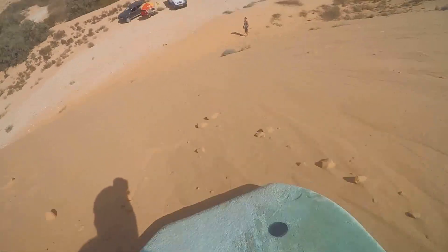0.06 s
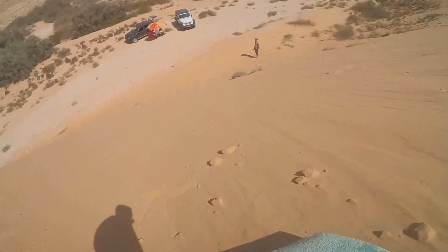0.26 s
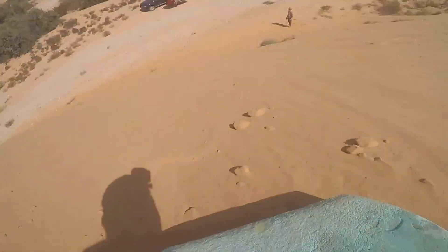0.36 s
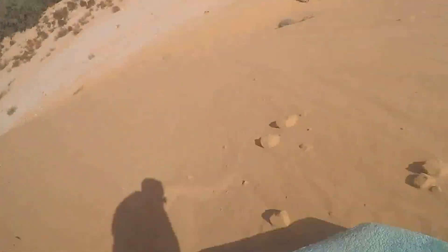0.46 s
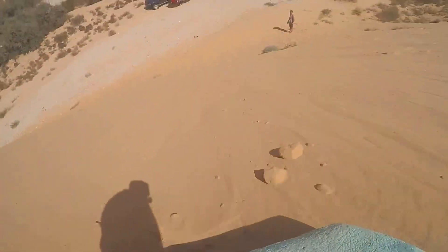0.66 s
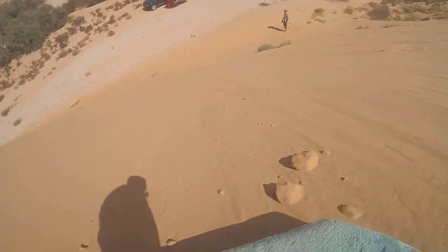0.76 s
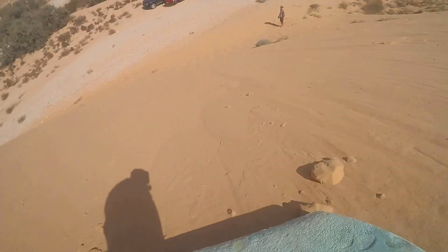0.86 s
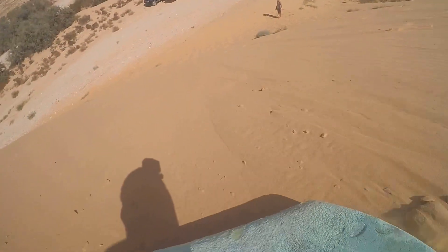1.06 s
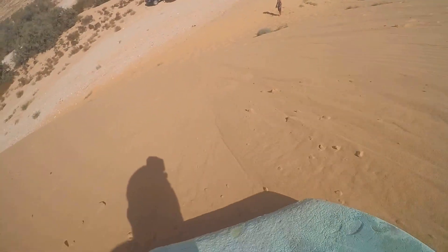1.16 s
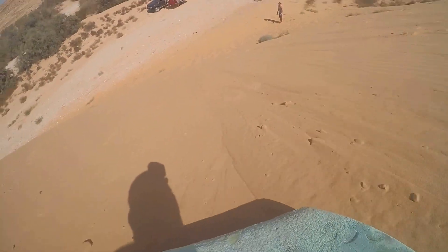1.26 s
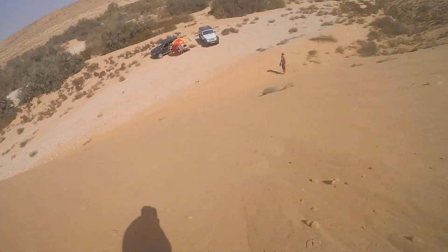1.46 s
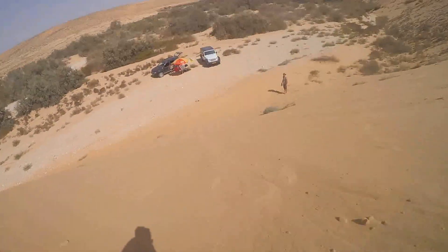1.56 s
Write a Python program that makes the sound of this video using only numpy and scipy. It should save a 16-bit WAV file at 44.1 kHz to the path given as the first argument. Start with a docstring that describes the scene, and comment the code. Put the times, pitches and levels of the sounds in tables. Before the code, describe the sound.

Sandy hiss of a sliding board, knocking over a bump as wind gusts on the microphone.

```python
"""A sandy hiss over low wind rumble: a board glides down a dune, heard from the rider's seat.
Countless grains rub its underside and sound its resonances, with a dry rasp early in the run and a
coarser crunch where the board digs in. Over a bump it rattles with a few hard knocks while a gust
heaves the air at the microphone."""
import sys
import numpy as np
from scipy import signal
from scipy.fft import rfft, irfft
from scipy.io import wavfile

SR = 44100
rng = np.random.default_rng(int(sys.argv[2]) if len(sys.argv) > 2 else 0)


def generate_wav(sig):
    """Save sig (samples, or channels by samples) to the path in sys.argv[1] as 16-bit PCM at SR."""
    pcm = np.round(np.clip(np.atleast_2d(sig).T, -1, 1) * 32767).astype(np.int16)
    wavfile.write(sys.argv[1], SR, pcm)


N = 70560
T = np.arange(N) / SR
BINS_HZ = np.arange(N // 2 + 1) * SR / N


def from_db(db):
    """Decibels to gain."""
    return 10 ** (np.asarray(db) / 20)


def unit_rms(x):
    """Scale to rms 1."""
    return x / np.sqrt(np.mean(x ** 2) + 1e-20)


def level(points):
    """Gain over time from (time_s, level_db) points."""
    return from_db(np.interp(T, *np.transpose(points)))


def spectrum(points):
    """Gain over frequency from (frequency_hz, gain_db) points."""
    hz, db = np.transpose(points)
    return from_db(np.interp(np.log(np.maximum(BINS_HZ, 1)), np.log(hz), db))


def coloured(x, points):
    """Give a steady sound the colour of these points."""
    return irfft(rfft(x) * spectrum(points), N)


def pulse(points):
    """The shortest causal pulse with the colour of these points."""
    cepstrum = irfft(np.log(spectrum(points)), N)
    cepstrum[1:N // 2] *= 2
    cepstrum[N // 2 + 1:] = 0
    return irfft(np.exp(rfft(cepstrum)), N)


def drift(hz):
    """A random wander, mostly slower than hz; rms 1."""
    return unit_rms(irfft(rfft(rng.standard_normal(N)) / (1 + (BINS_HZ / hz) ** 2), N))


def resonate(x, hz, width_hz):
    """A steep-sided resonance with gain 1 at its peak."""
    r = np.exp(-np.pi * width_hz / np.sqrt(np.sqrt(2) - 1) / SR)
    b = (1 - r * r) / 2 * np.array([1, 0, -1])
    a = [1, -2 * r * np.cos(2 * np.pi * hz / SR), r * r]
    return signal.lfilter(b, a, signal.lfilter(b, a, x))


def ring(hz, t60_s):
    """A struck mode: a sine that dies away from height 1."""
    return np.sin(2 * np.pi * hz * T) * from_db(-60 * T / t60_s)


def grains(per_s, spread_db):
    """Tiny random impacts of sand, uneven in size; rms 1."""
    sizes = from_db(spread_db * np.minimum(rng.exponential(1, N), 5))
    signs = rng.choice([-1, 1], N)
    strikes = rng.random(N) < per_s / SR
    return unit_rms(sizes * signs * strikes)


def rubbed(resonances, per_s, spread_db):
    """Each resonance is kept sounding by its own stream of grains."""
    return sum(from_db(db) * resonate(grains(per_s, spread_db), hz, width_hz)
               for hz, width_hz, db in resonances)


# Wind right on the microphone: time_s, level_db
WIND_LEVEL = [(0, -33), (.09, -40), (.16, -29.5), (.235, -21.5), (.285, -25), (.345, -17.5), (.44, -18),
              (.57, -21.5), (.66, -33.5), (.79, -32), (.88, -39.5), (1.0, -38.5), (1.28, -41.5),
              (1.42, -36), (1.47, -28), (1.52, -48.5), (1.6, -40.5)]
# Its colour, nearly all low end: frequency_hz, gain_db
WIND_SPECTRUM = [(10, 0.5), (22, 3.5), (36, -4), (48, -13.5), (62, -28), (100, -38.5), (200, -48),
                 (500, -56.5), (1500, -100)]
def wind():
    """Turbulence rumbles at the microphone; over the bump a gust swings the pressure slowly."""
    peak_s, rise_s, fall_s, heave_hz, heave_db = .418, .05, .18, 6.2, -3.5
    rumble = unit_rms(coloured(rng.standard_normal(N), WIND_SPECTRUM)) * level(WIND_LEVEL)
    age = T - peak_s
    swell = np.exp(-(age / np.where(age < 0, rise_s, fall_s)) ** 2)
    return rumble + from_db(heave_db) * swell * np.cos(2 * np.pi * heave_hz * age)


COARSE_SAND = dict(per_s=2300, spread_db=5.5)
# A dry rasp from below the seat, early in the run: time_s, level_db
RASP_LEVEL = [(0, -73), (.07, -54.5), (.15, -53), (.26, -51.5), (.35, -64), (.45, -79)]
# The resonances it sounds: pitch_hz, width_hz, relative_db
RASP_BANDS = [(594, 110, -9), (2165, 210, -1), (2970, 270, -8), (3584, 300, -6.5), (7960, 900, -19),
              (11500, 3000, -31.5)]
def rasp():
    """Sand rasps on a few narrow resonances as the run begins."""
    return unit_rms(rubbed(RASP_BANDS, **COARSE_SAND)) * level(RASP_LEVEL)


FINE_SAND = dict(per_s=14000, spread_db=3.5)
# Sand rubbing the underside, close below the microphone: time_s, level_db
GLIDE_LEVEL = [(0, -56.5), (.06, -52), (.11, -48.5), (.24, -50.5), (.33, -52.5), (.42, -47), (.6, -49),
               (.83, -51.5), (.92, -51), (1.0, -48.5), (1.12, -50), (1.36, -51), (1.5, -50.5), (1.6, -50.5)]
# The board's resonances under that rubbing: pitch_hz, width_hz, relative_db
GLIDE_BANDS = [(816, 263, -8.5), (1253, 57, -3), (1463, 144, -5), (2142, 250, 0.5), (2368, 105, 0.5),
               (2680, 157, -1), (3645, 140, -4.5), (3740, 354, -5), (5490, 550, -7), (6316, 335, -4),
               (7020, 630, -11.5), (8030, 740, -15)]
# Broad hiss between them: frequency_hz, gain_db
HISS_SPECTRUM = [(100, 3), (250, -12.5), (500, -19), (1000, -14.5), (2400, -11.5), (3200, -15.5),
                 (4800, -13), (7500, -24), (9300, -24.5), (12000, -29.5), (15000, -32.5)]
def glide():
    """Fine grains rub the board and keep its resonances sounding; the level flutters slightly."""
    hiss = coloured(grains(**FINE_SAND), HISS_SPECTRUM)
    board = rubbed(GLIDE_BANDS, **FINE_SAND)
    flutter_db = 0.78 * drift(hz=23.5)
    return unit_rms(hiss + board) * level(GLIDE_LEVEL) * from_db(flutter_db)


# The board biting into the dune, heard from the seat: peak_s, rise_s, fall_s, level_db
DIG_SWELLS = [(.105, 0.03, 0.026, -52.5), (.505, 0.063, 0.05, -46), (.69, .06, 0.059, -57.5),
              (.99, .05, 0.06, -53.5)]
# Resonances of the crunch: pitch_hz, width_hz, relative_db
CRUNCH_BANDS = [(185, 186, -5), (680, 180, 1), (950, 140, -37), (1296, 276, 1.5), (1500, 126, 3),
                (1800, 150, 2.5), (2243, 93, 2.5), (2777, 150, 2), (4050, 430, -20)]
def digs():
    """A coarser, lower crunch swells and fades each time the board digs into the sand."""
    load = sum(from_db(db) * np.exp(-((T - peak_s) / np.where(T < peak_s, rise_s, fall_s)) ** 2 / 2)
               for peak_s, rise_s, fall_s, db in DIG_SWELLS)
    return load * unit_rms(rubbed(CRUNCH_BANDS, **COARSE_SAND))


# The board rattling over the bump, close to the microphone; strength scales the whole knock:
# start_s, strength_db, cutoff_hz, ring_db, thud_db, grit_db
BUMP_KNOCKS = [(.3777, -34, 3500, -0.5, -26, -32), (.383, -29.5, 2500, -0.5, -22, -28),
               (.4132, -30.5, 3000, 6, -9, -28), (.4155, -28, 3000, 2, -19, -26),
               (.4192, -27.5, 2480, 3, -16.5, -28), (.4461, -19.5, 1260, 1.5, -39, -32),
               (.458, -9.5, 2950, -5, -29, -28), (0.4602, -22.5, 3500, -11.5, -38, -15.5),
               (0.497, -37, 600, 22, -20, -30), (0.5004, -37, 700, 5, -20, -30),
               (.5075, -35, 3500, 9, -17, -28), (.5212, -32.5, 1200, 14, -3.5, -26),
               (.525, -17, 2770, 1.5, -9, -15), (.581, -34, 3000, 9, -32, -38),
               (.5858, -35.5, 2500, -1, -28, -36), (.596, -31.5, 3500, 2.5, -24, -36)]
# The board's ring after a knock: pitch_hz, relative_db, t60_s
BOARD_MODES = [(787, -19, 0.039), (955, -22, 0.031), (1128, -19.5, 0.031), (1258, -16.5, 0.018),
               (1440, -25.5, 0.033), (1676, -18.5, 0.022), (2095, -14, 0.024), (2240, -9.5, 0.027),
               (2670, -15, 0.0081), (3600, -20.5, 0.029), (6200, -30, 0.0091)]
# The snap of the contact itself: frequency_hz, relative_db
SNAP_SPECTRUM = [(150, -8.5), (550, -15.5), (750, -23), (950, 0), (1300, 5.5), (1500, -1.5), (1850, 1.5),
                 (2500, 1.5), (3100, -16), (4800, -23), (8000, -27), (14000, -26)]
def knocks():
    """Each contact gives a snap, a short hollow ring, grit and a dull thud; soft contacts are darker."""
    snap_db, mode_scatter_db, grit_t60_s = 21.5, 4.1, 0.011
    snap = from_db(snap_db) * pulse(SNAP_SPECTRUM)
    modes = np.array([(-1) ** k * from_db(db) * ring(hz, t60_s)
                      for k, (hz, db, t60_s) in enumerate(BOARD_MODES)])
    thud = ring(hz=259, t60_s=.009)
    out = np.zeros(N)
    for start_s, strength_db, cutoff_hz, ring_db, thud_db, grit_db in BUMP_KNOCKS:
        body = from_db(ring_db + mode_scatter_db * rng.standard_normal(len(modes))) @ modes
        grit = from_db(grit_db - 60 * T / grit_t60_s) * rng.standard_normal(N)
        softness = signal.butter(1, cutoff_hz, fs=SR)
        hit = signal.lfilter(*softness, snap + body + grit) + from_db(thud_db) * thud
        start = int(start_s * SR)
        out[start:] += from_db(strength_db) * hit[:N - start]
    return out


def scene():
    """Sand, knocks and wind at one microphone riding on the seat."""
    return (glide() + digs() + rasp() + knocks() + wind())[None]


def record(dry):
    """The treble is cut steeply above 15 kHz."""
    return signal.sosfilt(signal.ellip(10, .1, 90, 15000, fs=SR, output="sos"), dry)


dry = scene()
out = record(dry)
generate_wav(out)
```